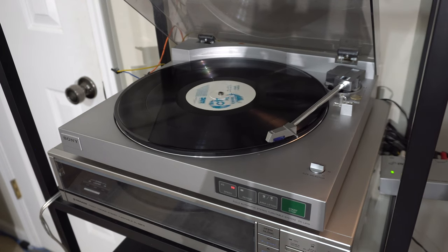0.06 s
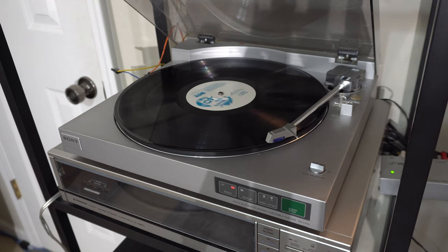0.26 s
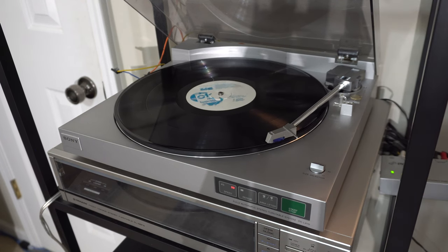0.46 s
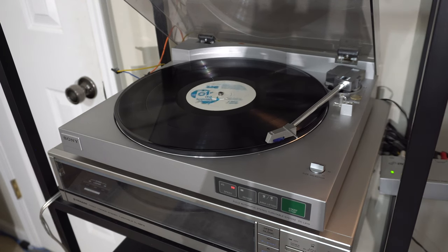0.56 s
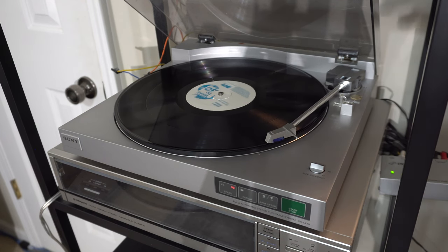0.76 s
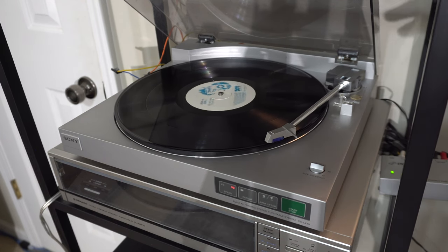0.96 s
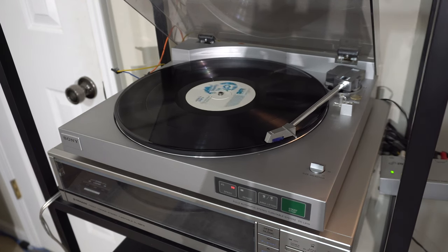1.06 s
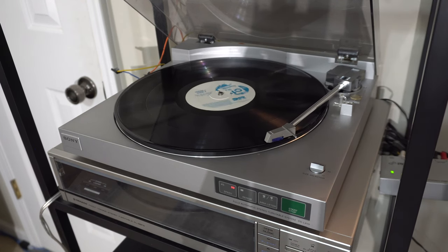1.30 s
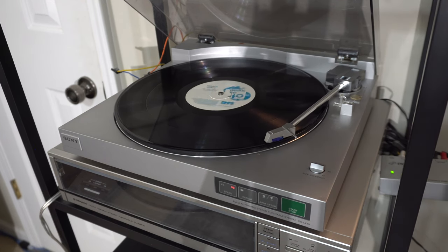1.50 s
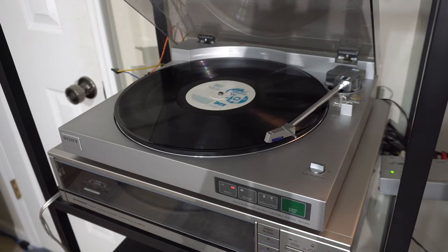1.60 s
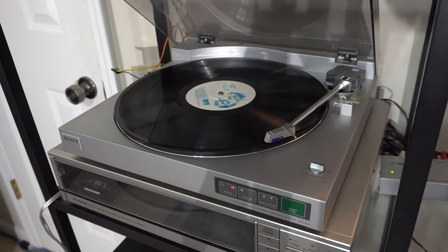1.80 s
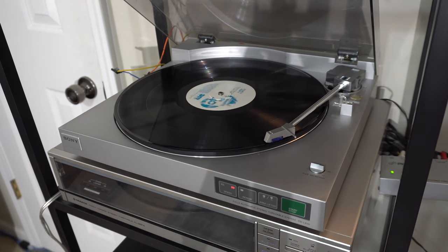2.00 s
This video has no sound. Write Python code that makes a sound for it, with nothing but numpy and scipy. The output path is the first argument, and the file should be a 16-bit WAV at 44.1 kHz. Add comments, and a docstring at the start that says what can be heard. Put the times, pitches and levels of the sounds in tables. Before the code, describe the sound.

Heard directly from a turntable's pickup, a stylus lands on vinyl after faint hum, skids briefly and pops loudly. Scattered clicks and crackles then continue over low rumble while the arm's faint motor stops with a soft knock.

```python
"""A stylus is lowered onto a spinning vinyl record, heard straight from the pickup. First there is only
faint mains hum. At half a second the tip lands softly, and turntable rumble and the drone of the arm's
lowering motor come through. The tip skids briefly and falls into the groove with one loud pop. Then dust
clicks on either groove wall over surface noise. A second after landing, the lift knocks softly against
its stop and the motor dies away, while the clicks go on."""
import sys
import numpy as np
from scipy import signal
from scipy.fft import rfft, irfft, next_fast_len
from scipy.io import wavfile
from scipy.ndimage import map_coordinates

SR = 44100
rng = np.random.default_rng(int(sys.argv[2]) if len(sys.argv) > 2 else 0)


def unload_wav(signal):
    """Save mono or channel-first audio to the path in sys.argv[1] as 16-bit WAV at rate SR, clipped to [-1, 1]."""
    wavfile.write(
        sys.argv[1],
        SR,
        np.round(np.clip(np.atleast_2d(signal).T, -1, 1) * 32767).astype(np.int16),
    )


N = 90404
LAND_S, POP_S = 0.4997, 0.5711


def amp(db):
    """Turn decibels into a gain."""
    return 10 ** (np.asarray(db) / 20)


def unit(x):
    """Scale a signal to an average (rms) level of 1."""
    return x / np.sqrt(np.mean(x ** 2) + 1e-20)


def clock():
    """The time of each sample in seconds."""
    return np.arange(N) / SR


def level(points):
    """A gain for each sample, drawn through (time_s, level_db) points."""
    return amp(np.interp(clock(), *np.transpose(points)))


def fade_in(start_s, fade_s):
    """A smooth rise from 0 to 1."""
    return np.sin(np.pi / 2 * np.clip((clock() - start_s) / fade_s, 0, 1)) ** 2


def filtered(x, response):
    """Multiply each frequency in x by response(hz)."""
    size = next_fast_len(N + SR // 2)
    return irfft(rfft(x, size) * response(np.fft.rfftfreq(size, 1 / SR)), size)[..., :N]


def coloured(x, points):
    """Shape bass and treble with (pitch_hz, gain_db) points, then scale to level 1."""
    pitch_hz, gain_db = np.transpose(points)
    return unit(filtered(x, lambda hz: amp(np.interp(np.log(hz + 1), np.log(pitch_hz + 1), gain_db))))


def wobble(per_s):
    """A smooth curve through per_s random values a second."""
    return unit(map_coordinates(rng.standard_normal(size=int(N * per_s / SR) + 4), [1 + clock() * per_s]))


def stereo_noise(alike):
    """White noise, left and right: alike is 1 for the same in both, -1 for opposite."""
    a, b = rng.standard_normal((2, N))
    angle = np.arccos(alike) / 2
    shared, opposed = np.cos(angle) * a, np.sin(angle) * b
    return np.array([shared + opposed, shared - opposed])


def grains(per_s, spread_db):
    """Tiny random kicks of uneven size on both groove walls."""
    sizes = amp(spread_db * np.minimum(rng.standard_normal((2, N)), 2))
    return (rng.random((2, N)) < per_s / SR) * sizes * [[-1], [1]]


def kick(ms, rise_ms, decay_ms):
    """A sharp spike in the tip's speed, highest at ms = 0."""
    return np.exp(-np.abs(ms) / np.where(ms < 0, rise_ms, decay_ms))


def on_wall(wall, x, leak=0.15):
    """Each groove wall plays in its own channel and leaks a little into the other."""
    return np.outer([-1, leak] if wall == "L" else [-leak, 1], x)


# mains hum tones: pitch_hz, level_db
HUM_TONES = [(60, -81.5), (120, -92)]
# tone of the amplifier's noise: pitch_hz, gain_db
AMPLIFIER_TONE = [(10, 9.5), (40, -15.5), (100, -20), (240, -21), (330, -28), (1000, -28), (4000, -36.5),
                  (11000, -38.5), (13000, -50.5)]
def amplifier():
    """Faint mains hum, the amplifier's own noise and a slow drift of its zero line."""
    hum = sum(np.sqrt(2) * amp(db) * np.sin(2 * np.pi * (hz * clock() + rng.random()))
              for hz, db in HUM_TONES)
    noise = amp(-72) * coloured(stereo_noise(alike=0.23), AMPLIFIER_TONE)
    drift = amp(-40.5) * wobble(per_s=4.82)
    return hum + noise + drift


# bounces of the tip: start_s, relative_level_db, pitch_hz, ring_s (time to fade by 60 dB)
TIP_BOUNCES = [(0.5, -10.5, 43.3, 0.041), (0.55, -22, 29.14, 0.071)]
def landing():
    """The tip bounces up and down on its springy mount, so the two channels swing opposite ways."""
    bounce = 0
    for start_s, db, hz, ring_s in TIP_BOUNCES:
        age_s = np.maximum(clock() - start_s, 0)
        bounce = bounce + amp(db - 60 * age_s / ring_s) * np.sin(2 * np.pi * hz * age_s)
    return np.outer([-0.75, 1.15], bounce)


# loudness of the skid: time_s, level_db
SKID_LEVELS = [(.5, -61), (.53, -55), (.552, -52), (.559, -46.5), (.57, -40.5), (.58, -68), (.6, -83.5)]
# tone of the skid: pitch_hz, gain_db
SKID_TONE = [(30, 3), (200, 2.5), (1500, -5.5), (3000, -7.5), (6000, -15), (10000, -24.5), (16000, -40)]
def skid():
    """The tip scrapes over the record's rim toward the groove."""
    scrape = coloured(stereo_noise(alike=-0.42), SKID_TONE) * level(SKID_LEVELS)
    end_s = SKID_LEVELS[-1][0]
    return scrape * fade_in(LAND_S, 0.0033) * (1 - fade_in(end_s, 0.023))


# loudness of the roar: time_s, level_db
ROAR_LEVELS = [(.6, -55.5), (.86, -59.5), (.95, -56.5), (1.25, -61), (1.5, -65), (2, -76.5)]
# tone of the roar: pitch_hz, gain_db
ROAR_TONE = [(30, -4.5), (100, 5), (200, -0.5), (400, -8), (800, -17), (2000, -43.5)]
def roar():
    """The uneven groove floor moves the tip up and down: dull noise, mostly opposite left and right."""
    return coloured(stereo_noise(alike=-0.8), ROAR_TONE) * level(ROAR_LEVELS) * fade_in(LAND_S, 0.02)


# the motor's tones: pitch_hz, left_db, right_db
MOTOR_TONES = [(192.7, -68.5, -84.5), (209, -70.5, -73.5), (229, -88, -74.5), (247, -71, -70.5),
               (284, -89.5, -89.5)]
def motor(off_s=1.534, speed_waver=0.014, flutter_db=0.6):
    """The lowering motor drones through the deck in slightly wavering tones until it stops."""
    turning_s = np.cumsum(1 + speed_waver * wobble(per_s=23)) / SR
    drone = 0
    for hz, left_db, right_db in MOTOR_TONES:
        tone = np.sqrt(2) * np.sin(2 * np.pi * (hz * turning_s + rng.random()))
        flutter = amp(flutter_db * wobble(per_s=23))
        drone = drone + np.outer(amp([left_db, right_db]), tone * flutter)
    return drone * fade_in(LAND_S, 0.06) * (1 - fade_in(off_s, 0.095))


# strength of the arm's sway: time_s, level_db
SWAY_LEVELS = [(.52, -43), (.62, -28.5), (.8, -30), (1, -31), (1.2, -38.5), (1.32, -25), (1.45, -33),
               (1.56, -37.5), (1.72, -28), (2.04, -50.5)]
# tones of the sway and of the bearing: pitch_hz, gain_db
SWAY_TONE = [(4, -14.5), (11, -3), (17, -2.5), (28, -19.5), (50, -31), (80, -45.5), (600, -110)]
BEARING_TONE = [(10, -8), (30, 7), (50, -7.5), (80, -13.5), (130, -19), (250, -33), (2000, -100)]
def rumble():
    """The warped record sways the arm, mostly up and down; the turntable's bearing rumbles steadily."""
    sway = coloured(stereo_noise(alike=-0.36), SWAY_TONE) * level(SWAY_LEVELS)
    bearing = amp(-54) * coloured(stereo_noise(alike=-0.54), BEARING_TONE)
    return (sway + bearing) * fade_in(LAND_S, 0.11)


# bursts of fizz: middle_s, half_length_s, left_level_db
FIZZ_BURSTS = [(0.563, 0.008, -48.5), (0.742, 0.02, -73.5), (0.958, 0.0036, -60.5), (1.263, 0.0091, -69.5),
               (1.376, 0.0048, -65), (1.453, 0.008, -67), (1.666, 0.0057, -55), (1.691, 0.017, -68)]
# tone of the fizz: pitch_hz, gain_db
FIZZ_TONE = [(100, -19.5), (1500, 4.5), (5000, -1), (10000, -5.5), (16000, -14.5)]
def fizz(right_db=-4.5):
    """Short, bright, gritty bursts of fizz, mostly on the left; the loudest is just before the pop."""
    swell = sum(amp(db) * np.exp(-((clock() - middle_s) / half_s) ** 2)
                for middle_s, half_s, db in FIZZ_BURSTS)
    grit = coloured(grains(per_s=1600, spread_db=6), FIZZ_TONE)
    return swell * grit * amp([[0], [right_db]])


def pop(crack_lag_ms=0.086, bass_cut_hz=22, resonance=1.27):
    """The tip slams into the left wall with a crack and a bass surge; the right wall only twitches."""
    ms = (np.arange(N) - round(POP_S * SR)) * 1000 / SR
    surge = kick(ms - crack_lag_ms / 2, rise_ms=0.041, decay_ms=5.2)
    crack = kick(ms - crack_lag_ms, rise_ms=0.041, decay_ms=0.24)
    # the pickup drops the deepest bass, which makes the surge swing back
    bass_cut = lambda hz: -hz ** 2 / (bass_cut_hz ** 2 - hz ** 2 + 1j * hz * bass_cut_hz / resonance)
    left = filtered(amp(-2) * (surge + crack), bass_cut)
    twitch = kick(ms, rise_ms=0.06, decay_ms=0.03)
    recoil = 0.42 * kick(ms - 0.15, rise_ms=0.06, decay_ms=0.15)
    return np.array([left, amp(-15) * (twitch - recoil)])


# surface noise as worn patches pass: time_s, relative_level_db
WEAR_LEVELS = [(.58, -66), (.69, -71), (.75, -66), (.8, -71.5), (.905, -75.5), (.93, -65), (.99, -66),
               (1.04, -76), (1.11, -70), (1.21, -76), (1.29, -72.5), (1.42, -76.5), (1.64, -75.5),
               (1.675, -72), (1.72, -75), (2.04, -79)]
# tones of the hiss and of the crackle: pitch_hz, gain_db
HISS_TONE = [(30, 6.5), (250, 1.5), (600, 2.5), (1200, 2.5), (2500, -2.5), (5000, -11), (9000, -18),
             (12000, -31), (16000, -48)]
CRACKLE_TONE = [(30, 3), (500, 4.5), (2500, 2), (6000, -6.5), (12000, -9.5), (16000, -25)]
def surface():
    """The groove hisses and finely crackles, louder on worn patches."""
    hiss = amp(1) * coloured(stereo_noise(alike=-0.46), HISS_TONE)
    crackle = amp(-3) * coloured(grains(per_s=420, spread_db=7), CRACKLE_TONE)
    lean_left = amp([[0.75], [-0.75]])
    return (hiss + crackle) * level(WEAR_LEVELS) * fade_in(POP_S, 0.005) * lean_left


def jolt(ms, decay_ms, tail_share=0.054):
    """A speck's kick to the tip, with a weak, longer tail that adds bass."""
    rise_ms = 0.36 * decay_ms
    tail = kick(ms, rise_ms, decay_ms=0.88)
    return (1 - tail_share) * kick(ms, rise_ms, decay_ms) + tail_share * tail


# specks of dust: time_s, wall (L or R), first_kick_db, crossing_ms, rebound (times first kick), decay_ms
DUST_SPECKS = [ (0.7089, "L", -42, 0.23, 0.42, 0.073), (0.7472, "R", -34, 0.32, 0.06, 0.114),
               (0.844, "R", -27.5, 1.45, 0.93, 0.073), (0.8732, "R", -42, 0.42, .8, 0.23),
               (0.9144, "R", -17, 0.67, 0.69, 0.079), (0.9589, "R", -31.5, 0.73, 0.2, 0.094),
               (0.9626, "R", -34.5, 0.45, 0.62, 0.1), (0.9795, "R", -30.5, 0.47, 3.66, 0.083),
               (0.9834, "R", -27, 0.21, 0.062, .05), (0.9997, "R", -28, 0.42, 0.35, 0.12),
               (1.0392, "R", -36.5, .33, 4.4, 0.09), (1.0730, "R", -41.5, 0.33, 3.7, 0.16),
               (1.1405, "R", -42.5, 0.6, 1.04, 0.13), (1.2590, "L", -42.5, 0.089, .2, 0.043),
               (1.271, "L", -34, 0.094, 0.45, 0.02), (1.2986, "L", -34, .25, 0.56, 0.074),
               (1.3077, "R", -40.5, .2, 0.14, 0.048), (1.3582, "R", -40.5, 0.36, 0.14, 0.14),
               (1.3856, "R", -36, 0.05, 0.29, 0.045), (1.5090, "R", -46, 0.35, 0.23, 0.16),
               (1.5705, "L", -40.5, 0.13, 0.15, 0.024), (1.6607, "L", -36, 0.12, 0.4, 0.043),
               (1.6659, "L", -29.5, 0.078, 0.23, 0.059), (1.6694, "L", -33, 0.078, .5, 0.064),
               (1.7438, "L", -42, 0.11, 0.32, 0.057), (1.7466, "L", -42.5, 0.1, 0.3, 0.04),
               (1.7863, "L", -36, 0.19, 0.13, 0.036), (1.7932, "L", -40, 0.13, 0.16, 0.045),
               (1.7986, "L", -39, 0.12, 0.08, 0.062), (1.8165, "L", -37.5, 0.26, 0.26, 0.042),
               (1.8474, "L", -33, 0.2, 0.43, 0.053), (1.86, "L", -40.5, 0.15, 0.93, 0.089),
               (2.0210, "L", -20.5, 0.048, 0.93, 0.11)]
def clicks():
    """Each speck kicks the tip one way as it climbs on and the other way as it drops off."""
    out = np.zeros((2, N + SR))
    lead = SR // 200  # samples of room for the kick to rise
    ms = np.arange(-lead, 3 * lead) * 1000 / SR
    for time_s, wall, db, crossing_ms, rebound, decay_ms in DUST_SPECKS:
        ride_over = 0.21 * np.sin(np.pi * np.clip(ms / crossing_ms, 0, 1))
        drop_off = rebound * jolt(ms - crossing_ms, decay_ms)
        click = amp(db) * (jolt(ms, decay_ms) + ride_over - drop_off)
        start = round(time_s * SR) - lead
        out[:, start:start + len(ms)] += on_wall(wall, click)
    return out[:, :N]


# smooth swings of the tip: middle_s, wall (L or R), level_db, half_width_ms
TIP_SWINGS = [(.9152, "R", -46, 1.36), (.9305, "L", -41, 1.53), (.9618, "R", -40.5, 2.4),
              (1.0001, "R", -41.5, 0.82), (1.0394, "R", -34, 0.2), (1.1021, "L", -47, .5)]
def thuds():
    """Smooth swings out and back: soft, dull thuds, and the rounded start of the click at 1.04 s."""
    out = 0
    for middle_s, wall, db, half_width_ms in TIP_SWINGS:
        position = (clock() - middle_s) * 1000 / half_width_ms
        swing = -position * np.exp((1 - position ** 2) / 2)
        out = out + on_wall(wall, amp(db) * swing)
    return out


# tones of the knock: pitch_hz, left_level_db, ring_s (time to fade by 60 dB)
KNOCK_TONES = [(137.7, -49, 0.26), (181, -51, 0.13), (252, -49.5, 0.06)]
def lift_stop(start_s=1.507):
    """The arm's lift reaches its stop with a soft, low knock, mostly on the left."""
    age_s = np.maximum(clock() - start_s, 0)
    ring = sum(amp(db - 60 * age_s / ring_s) * np.sin(2 * np.pi * hz * age_s)
               for hz, db, ring_s in KNOCK_TONES)
    return np.outer([1, 0.25], ring * fade_in(start_s, 0.0065))


def scene():
    """Everything the pickup sends out, left and right."""
    touchdown = landing() + skid() + pop()
    groove = surface() + clicks() + thuds() + fizz() + roar()
    machinery = rumble() + motor() + lift_stop()
    return touchdown + groove + machinery + amplifier()


def record(dry):
    """Peaks are cut off at full scale, then the very highest treble is removed."""
    treble_cut = signal.cheby2(16, 70, 17400, fs=SR, output="sos")
    return signal.sosfiltfilt(treble_cut, np.clip(dry, -1, 1))


dry = scene()
out = record(dry)
unload_wav(out)
```